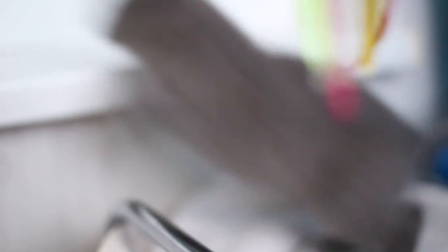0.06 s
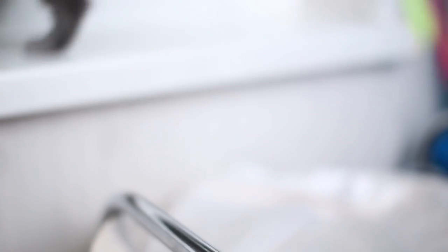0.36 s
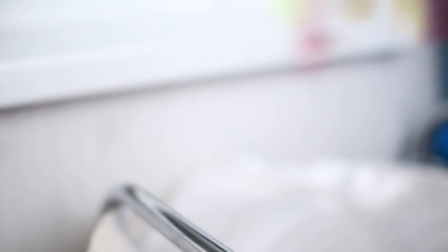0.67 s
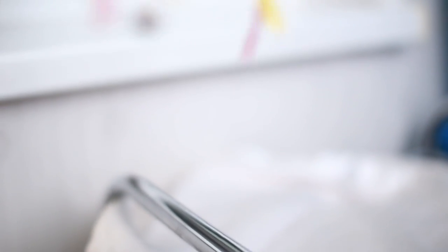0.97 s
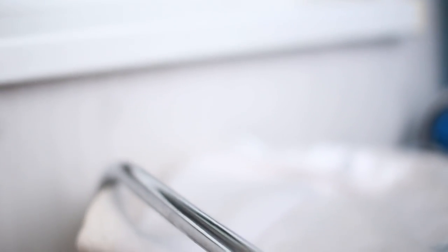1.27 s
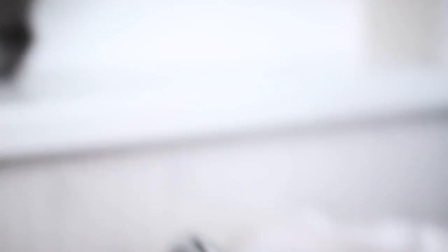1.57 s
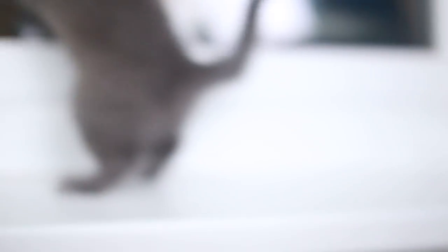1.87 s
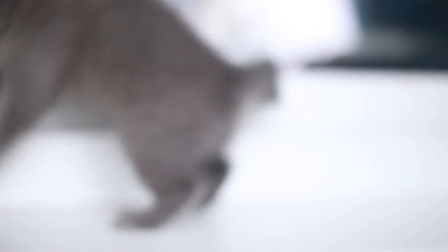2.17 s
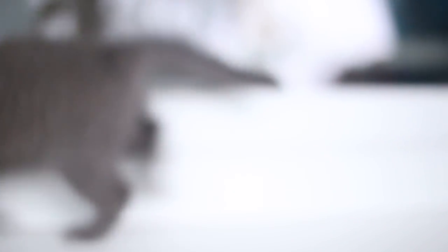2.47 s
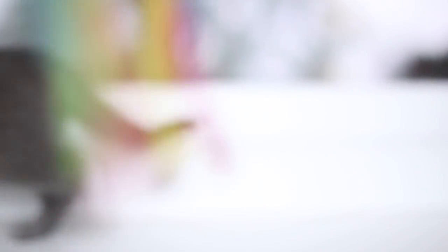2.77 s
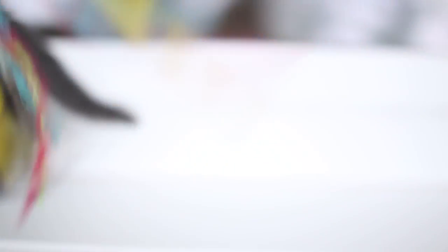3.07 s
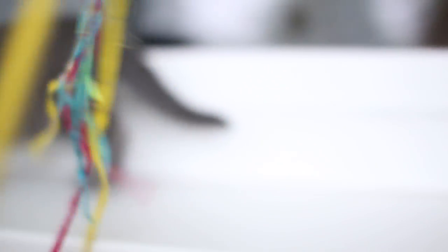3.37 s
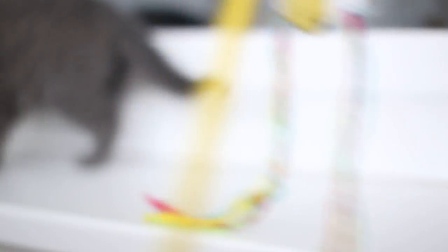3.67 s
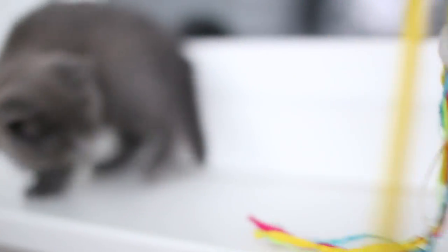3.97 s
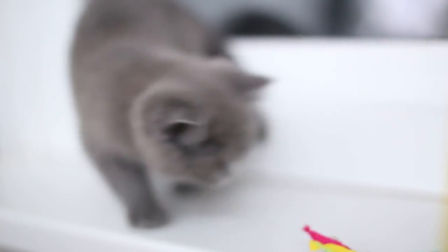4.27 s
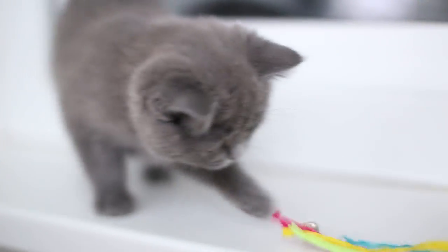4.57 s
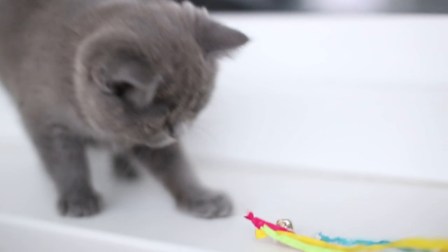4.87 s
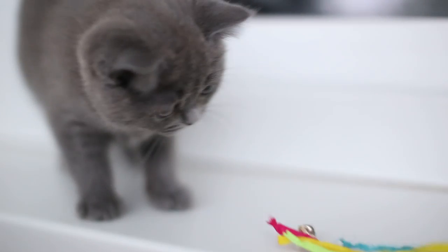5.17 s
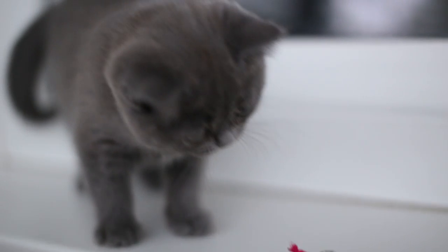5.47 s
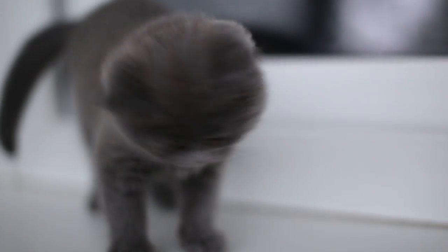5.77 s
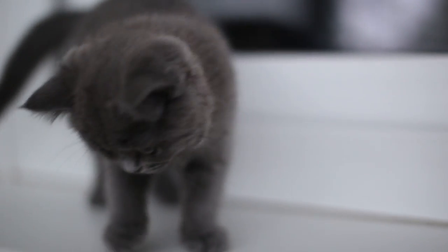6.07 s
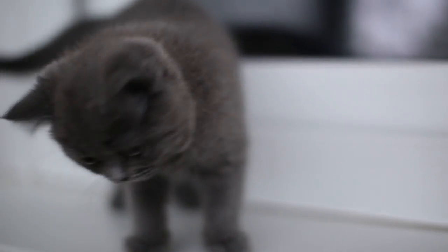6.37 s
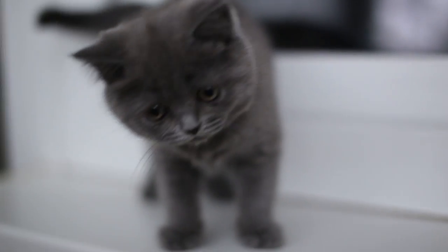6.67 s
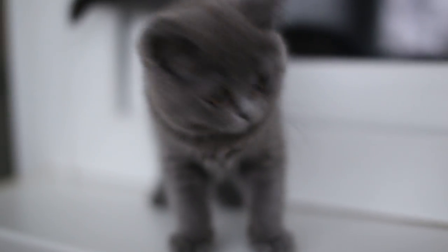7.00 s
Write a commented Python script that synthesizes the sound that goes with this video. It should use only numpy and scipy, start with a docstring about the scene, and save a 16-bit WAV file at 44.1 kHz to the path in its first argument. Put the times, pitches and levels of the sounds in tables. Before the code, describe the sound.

Soft kitten paws thud and scuff on a hollow wooden ledge while a wand toy clacks and its small bell jingles briefly.

```python
"""A small steel bell jingles on a ribboned wand toy as a kitten chases it along a hollow painted ledge.
A loose pellet strikes the bell's shell and excites its modes. The toy clacks down, ringing wand and
board; soft paws thud on the board and scuff over it by stick-slip friction. A small hard-walled room
reverberates after each contact, over a quiet hiss, a faint rustle and a low drone that comes and goes."""
import sys
import numpy as np
from scipy import signal
from scipy.fft import rfft, irfft, next_fast_len
from scipy.io import wavfile
from scipy.ndimage import uniform_filter1d

SR = 44100
rng = np.random.default_rng(int(sys.argv[2]) if len(sys.argv) > 2 else 0)


def transcribe(u):
    """Save the signal u as a 16-bit wav file named by the first command-line argument.

    u: samples, shape (n,) or (channels, n), limited to [-1, 1]; the rate is SR.
    q: integer samples, one column per channel.
    """
    v = np.clip(np.atleast_2d(u).T, -1, 1)
    q = np.round(v * 32767).astype(np.int16)
    wavfile.write(sys.argv[1], SR, q)


N = 314874
T = np.arange(int(.6 * SR)) / SR  # time axis of one event, in seconds

# Background spectra. Each row: frequency in Hz, relative level in dB.
AIR_SPECTRUM = [(15, -62), (25, -9), (59, 0.5), (80, -5), (141, -1), (161, -2), (261, -11), (352, -7),
                (527, -11), (572, -9.5), (1120, -13.5), (1980, -19), (2660, -37), (5370, -22),
                (15800, -31.5)]
DRONE_SPECTRUM = [(100, -18), (200, -5), (280, 1.5), (360, -9), (500, -16.5), (900, -20.5), (2000, -30),
                  (6000, -55)]
RUSTLE_SPECTRUM = [(200, -15), (800, 0.5), (3000, 1.5), (5500, -13), (9500, -12), (13000, -10),
                   (16000, -15)]
# The drone's swells. Each row: time in seconds, relative level in dB.
DRONE_CONTOUR = [(0.0, -57), (0.34, -58), (0.89, -70), (1.37, -61), (2.3, -71.5), (2.54, -58), (2.72, -53),
                 (3.14, -55), (3.32, -64), (7.14, -72)]
# Spectra of sliding fur and ribbon, a paw's thud, the knocked board, the wand and a hard contact point.
# Each row: frequency in Hz, relative level in dB.
HISS_SPECTRUM = [(1500, -30), (4000, 8), (5500, -0.5), (9500, 4.5), (12000, -5), (16000, -22)]
THUD_SPECTRUM = [(20, -29), (40, -12), (65, -12), (90, 3), (200, -1), (320, 0), (450, -12), (700, -18.5),
                 (1100, -31), (3000, -28.5), (9000, -57)]
BOARD_SPECTRUM = [(100, -32), (180, -22), (240, -10), (330, -2.5), (480, -2), (680, 3.5), (1000, 2.5),
                  (1500, 0.5), (2500, -9.5), (6000, -88)]
WAND_SPECTRUM = [(400, -11), (1000, -11), (1500, 2.5), (2300, -2), (3300, 4.5), (4500, 0), (5600, -12),
                 (7500, -10), (15000, -29)]
TICK_SPECTRUM = [(2000, -11), (4500, -3), (6000, 0.5), (8000, 7), (10000, 5.5), (12000, 0.5), (13500, -15),
                 (16000, -5)]
# Paws and ribbons slide. Each row: start in seconds, length in seconds, rub level in dB,
# centre in Hz, width in octaves, hiss relative to the rub in dB.
SLIDES = [(0.034, 0.055, -40.5, 1740, 0.55, -33), (.268, 0.03, -59, 2000, 1.7, -7),
          (0.376, 0.038, -44.5, 764, 0.79, -24), (0.462, 0.038, -46, 735, 0.93, -13),
          (0.503, 0.054, -47, 1310, 1.03, -7.5), (0.946, 0.035, -51.5, 3360, 0.23, -9),
          (0.991, .03, -49, 3950, 0.54, -15), (1.216, 0.034, -48.5, 3500, 0.49, -17),
          (1.503, 0.062, -37.5, 2350, 0.68, -9), (2.529, 0.06, -39.5, 1720, 0.89, -22),
          (2.723, 0.062, -40, 1870, 0.96, -25), (2.745, 0.048, -39, 2150, 0.59, -13),
          (3.28, 0.026, -32, 1590, 0.63, -28), (3.619, 0.12, -38, 2140, 1.45, -2.5),
          (4.194, 0.094, -56.5, 3360, 0.53, 2), (4.483, 0.11, -45, 2770, 1.04, -30),
          (4.56, 0.11, -47, 2360, 1.05, -29), (4.881, 0.027, -56.5, 3100, 0.74, -2.5),
          (4.947, 0.04, -54, 2500, 0.96, -2), (5.001, 0.097, -56, 587, 1.6, -2.5),
          (5.538, 0.088, -57, 1530, 1.4, -16), (5.719, 0.2, -59, 2800, 0.83, -4),
          (6.017, 0.51, -62, 3020, 0.84, 1), (6.439, 0.045, -54, 1820, 1.35, -0.5),
          (6.817, 0.058, -55.5, 3020, 0.85, -2.5)]
# Paws land. Each row: start in seconds, thud level in dB, flatness as a midrange boost in dB,
# boom frequency in Hz, boom t60 (time to fall 60 dB) in seconds.
LANDINGS = [(0.037, -52, 7, 281, 0.12), (.48, -48.5, -2, 293, 0.13), (.791, -48, 9, 192, 0.067),
            (0.813, -49.5, -11.5, 182.6, 0.19), (1.255, -42.5, 3.5, 213, .25),
            (1.266, -43, -2.5, 167.5, 0.52), (1.337, -53, -15, 184, .34), (1.514, -46.5, 2, 167, 0.19),
            (1.567, -47.5, 4, 106, 0.13), (2.039, -60.5, -2, 184, .07), (2.539, -40.5, 1.5, 130, 0.2),
            (2.617, -45, 2, 90, 0.17), (2.71, -49.5, -3, 266, 0.23), (2.745, -40.5, 0.5, 84, 0.22),
            (2.848, -54.5, -17, 94, 0.062), (3.566, -53, -1, 109.5, 0.35), (4.028, -47, 1, 185.6, .19),
            (4.565, -44, 6, 90.4, 0.21), (4.954, -54.5, 2, 149, .1), (5.011, -41.5, 5, 89.6, 0.29),
            (5.139, -56.5, 0, 77, 0.29), (5.602, -46, 11.5, 208, 0.22), (6.287, -42.5, -8.5, 206, .06),
            (6.291, -48, -10, 101.5, 0.21), (6.331, -51, -14, 199.5, 0.043),
            (6.447, -46.5, -8.5, 117, 0.18), (6.48, -53.5, -12, 167, 0.12), (6.955, -60, -11, 89, 0.11)]
# Toy and claws hit the ledge. Each row: start in seconds, base level in dB, wand's share from 0 to 1,
# relative tick level in dB, resonance of the struck spot in Hz.
BLOWS = [(.358, -55.5, .03, -27, 676), (0.46, -50.5, .05, -24, 714), (.511, -37.5, 0, -29, 668),
         (0.7864, -55, 0.05, -15, 690), (.881, -61.5, .5, -25, 3450), (.947, -53.5, 0.8, -12, 3240),
         (1.219, -50, 0, -16, 4170), (1.509, -44, 0.93, -8, 2740), (1.969, -45.5, 0, -22, 735),
         (1.97, -51, 0.35, -18, 3060), (3.2663, -31.5, 0.25, 1.5, 2130), (3.2673, -36, 0.4, 7, 316),
         (3.548, -32, 0.29, -2.5, 7540), (3.610, -28, 0.96, -5, 4370), (4.457, -41.5, 1, -36, 4310),
         (4.472, -49, .9, -28, 2470), (5.601, -47, 0.03, -32, 334), (6.507, -44, 0.85, -17, 3690),
         (6.597, -58.5, 1, 5, 8800)]
# Modes of the board and the stiff wand. Each row: frequency in Hz, relative level in dB, t60 in seconds.
BOARD_RESONANCES = [(354.6, 1.5, 0.41), (577, -16.5, 0.98), (698, 11.5, 0.12), (911, 10, 0.23),
                    (1264, -19, 0.27), (1500, -29, 0.58)]
WAND_RESONANCES = [(1367, -15, 0.34), (1715, -7, 0.13), (2088, -7, 0.1), (2500, -0.5, 0.042),
                   (3174, 3, 0.033), (3466, 6.5, 0.036), (3780, 0, 0.11), (4210, 4.5, 0.034),
                   (4660, 2, 0.04), (5950, -6.5, 0.071)]
# The bell's shell: three low and two high families of close modes. Each row is one family,
# and each of its modes: frequency in Hz, relative level in dB, t60 in seconds.
SHELL_FAMILIES = [
    [(2790, -13, 0.23), (4118, -1.5, 0.26)],
    [(4170, -17, 0.23), (4422, 10, 0.17), (4540, -6, .25), (4701, -6, .22), (4885, -3, 0.19)],
    [(4885, -14, 0.5), (4908, 1.5, 0.19)],
    [(9001, -12, 0.15), (9590, 1.5, 0.16), (10093, -2, 0.15)],
    [(11580, -8, 0.29), (11555, 0, 0.17), (15450, -21, .22)],
]
# Nominal pitch of each low family in Hz.
LOW_FAMILY_HZ = [4100, 4420, 4900]
# Level offset of each high family in dB.
HIGH_FAMILY_DB = [0.5, -4]
# The pellet hits the shell. Each row: start in seconds, base ring level in dB,
# pitch that the struck spot favours in Hz, hardness as a boost of the high families in dB.
PELLET_HITS = [(2.331, -49.5, 4900, -2.5), (2.348, -38, 4900, -2.5), (2.377, -44.5, 4900, -7),
               (2.410, -45.5, 4900, -5), (2.423, -52, 4900, 7.5), (2.445, -49.5, 4160, -4),
               (3.267, -37.5, 4900, 4.5), (3.278, -29.5, 4480, -5), (3.367, -44, 4900, 1),
               (3.548, -38, 4100, -4), (3.558, -45.5, 4100, 5), (3.578, -38.5, 4900, -2.5),
               (3.611, -35, 4100, 1), (3.633, -33, 4280, -14), (3.679, -42, 4200, -1.5),
               (4.506, -51, 4100, 3.5), (4.56, -47, 4300, -7), (4.645, -54.5, 4900, -22)]


def undb(db):
    """Amplitude ratio of a level in decibels."""
    return 10 ** (np.asarray(db) / 20)


def fade(t60):
    """Exponential decay: 60 dB are lost in t60 seconds."""
    return np.exp(-np.log(1000) * T / t60)


def noise(size):
    """Gaussian white noise: equal mean power at all frequencies."""
    return rng.standard_normal(size)


def colour(x, spectrum):
    """Minimum-phase filtering through (Hz, dB) points, by the folded cepstrum."""
    size = next_fast_len(len(x) + 2048, real=True)
    size += size % 2
    hz, db = np.transpose(spectrum)
    bin_hz = np.fft.rfftfreq(size, 1 / SR)
    log_gain = np.log(undb(np.interp(np.log(bin_hz + 1), np.log(hz), db)))
    cepstrum = irfft(log_gain)[:size // 2]
    cepstrum[1:] *= 2
    return irfft(rfft(x, size) * np.exp(rfft(cepstrum, size)))[:len(x)]


def level(x, db):
    """Short-time rms scaling: the loudest 30 ms are brought to the given level."""
    power = uniform_filter1d(x ** 2, int(.03 * SR), mode="constant").max()
    return x * undb(db) / np.sqrt(power)


def add(out, start_s, x):
    """Superposition: an event adds to the sound already there."""
    start = max(int(start_s * SR), 0)
    out[start:start + len(x)] += x[:N - start]


def room(x, wet_db):
    """Reverberation: dense early reflections and a tail, longest in the treble, follow the direct sound."""
    white = noise(len(T))
    bass, below_treble = (signal.sosfilt(signal.butter(1, hz, fs=SR, output="sos"), white)
                          for hz in (500, 5000))
    middle, treble = below_treble - bass, white - below_treble
    late = bass * fade(t60=0.21) + middle * fade(t60=0.36) + treble * fade(t60=0.42)
    early = noise(len(T)) * fade(t60=0.16)
    build_up = 1 - np.exp(-T / 0.0067)
    echo = signal.fftconvolve(x, (early + undb(-3) * late) * build_up)[:len(T)]
    return x + undb(wet_db) * echo * np.std(x) / np.std(echo)


def mode(hz, t60, drift_hz=0):
    """Free vibration of a damped oscillator struck at rest; its pitch may drift."""
    return np.sin(2 * np.pi * (hz * T + np.cumsum(drift_hz) / SR)) * fade(t60)


def ring(modes, sway_hz=0):
    """Modal superposition: the balance varies with each blow, and a tumbling body's pitches waver."""
    knots = np.linspace(0, T[-1], 40)
    out = np.zeros(len(T))
    for hz, db, t60 in modes:
        gain = undb(db + rng.normal())
        drift_hz = sway_hz * np.interp(T, knots, noise(len(knots)))
        out += gain * mode(hz, t60, drift_hz)
    return out


def crack(spectrum, t60):
    """Modal overlap: a brief contact excites so many damped modes that they merge into a noise burst."""
    return colour(noise(len(T)) * fade(t60), spectrum)


def wavering_noise(spectrum, waver_db, rate_hz):
    """Random amplitude modulation: coloured noise wanders in level about an rms of 1."""
    x = colour(noise(N), spectrum)
    wander = np.interp(np.arange(N) / SR * rate_hz, np.arange(512), noise(512))
    return x / np.std(x) * undb(waver_db * wander)


def background():
    """Incoherent sources add: room hiss, a swelling low drone and the rustle of fur and ribbons."""
    drone_db = 3 + np.interp(np.arange(N) / SR, *np.transpose(DRONE_CONTOUR))
    air = undb(-59) * wavering_noise(AIR_SPECTRUM, waver_db=-0.6, rate_hz=3.6)
    drone = undb(drone_db) * wavering_noise(DRONE_SPECTRUM, waver_db=2.5, rate_hz=7.9)
    rustle = undb(-60.5) * wavering_noise(RUSTLE_SPECTRUM, waver_db=.6, rate_hz=30)
    return air + drone + rustle


def scuffs(slips_per_s=2500, spread_db=2.0, skirt_db=9, rise_share=0.049):
    """Stick-slip friction: dense tiny slips drive a broad resonance and a hiss of fur and ribbon."""
    out = np.zeros(N)
    grid_hz = np.geomspace(60, 16000, 40)
    for start, length, rub_db, centre_hz, width, hiss_db in SLIDES:
        stroke = (1 - np.exp(-T / (rise_share * length))) * np.exp(-(T / length) ** 4)
        sizes = noise(len(T)) * undb(spread_db * np.minimum(rng.exponential(size=len(T)), 4))
        slips = sizes * (rng.random(len(T)) < slips_per_s / SR)
        friction = stroke * (slips + 0.25 * noise(len(T)))
        detuning = np.log2(grid_hz / centre_hz) / width
        steepness = np.where(grid_hz > centre_hz, 2, 1)
        resonance_db = -skirt_db * np.log1p(detuning ** 2 / 2) * steepness
        rub = colour(friction, np.c_[grid_hz, resonance_db])
        add(out, start, level(room(rub, wet_db=-1.5), rub_db))
        add(out, start, level(room(colour(friction, HISS_SPECTRUM), wet_db=0), rub_db + hiss_db))
    return out


def paws(contact_s=0.0027, boom_loss_per_flatness=0.46):
    """Soft impact: a slow push excites mainly low board modes; a flat pad slaps more and damps the boom."""
    out = np.zeros(N)
    push = 1 - np.exp(-T / contact_s)
    for start, db, flat_db, boom_hz, t60 in LANDINGS:
        spectrum = [(hz, band_db + flat_db * (400 < hz < 2000)) for hz, band_db in THUD_SPECTRUM]
        thud = colour(noise(len(T)) * push * fade(t60=0.093), spectrum)
        boom = push * mode(boom_hz, t60)
        add(out, start, level(room(thud, wet_db=-5.5), db))
        add(out, start, level(room(boom, wet_db=-7), db - boom_loss_per_flatness * flat_db))
    return out


def knocks(spot_cycles=14, bounce_above_share=.7, bounce_loss_db=9.5):
    """Hard impact: board and wand divide the energy, while the contact ticks and the struck spot rings."""
    out = np.zeros(N)
    for start, db, wand_share, tick_db, spot_hz in BLOWS:
        wand_share = np.clip(wand_share, .005, .995)
        board_db, wand_db = db + 10 * np.log10([1 - wand_share, wand_share])
        add(out, start, level(room(crack(BOARD_SPECTRUM, t60=0.042), wet_db=0), board_db))
        add(out, start, level(room(ring(BOARD_RESONANCES), wet_db=-8), board_db - 10))
        add(out, start, level(room(crack(TICK_SPECTRUM, t60=0.0038), wet_db=-1), db + tick_db))
        spot = mode(spot_hz, t60=0.017 + spot_cycles / spot_hz)  # low modes ring longer
        add(out, start, level(room(spot, wet_db=2.5), db - 2))
        # a wand that takes most of the blow strikes twice more, weaker each time
        for bounce, delay in enumerate([0, .012, 0.043]):
            clack = level(room(crack(WAND_SPECTRUM, t60=0.0077), wet_db=11), -4)
            wand_ring = level(room(ring(WAND_RESONANCES), wet_db=-4.5), -2)
            if bounce == 0 or wand_share > bounce_above_share:
                add(out, start + delay, (clack + wand_ring) * undb(wand_db - bounce * bounce_loss_db))
    # a high-pass at 190 Hz keeps low rumble out of the knocks
    return signal.sosfilt(signal.butter(4, 190, "high", fs=SR, output="sos"), out)


def bell(loss_db_per_octave=65, max_loss_db=12, tick_per_hardness=1.58, skitter_above_db=5):
    """Shell vibration: where the pellet hits selects the low modes; hardness adds high modes and tick."""
    out = np.zeros(N)
    for start, ring_db, spot_hz, hard_db in PELLET_HITS:
        octaves_off = np.abs(np.log2(np.array(LOW_FAMILY_HZ) / spot_hz))
        low_db = -np.minimum(loss_db_per_octave * octaves_off, max_loss_db)
        high_db = hard_db + np.array(HIGH_FAMILY_DB)
        for modes, family_db in zip(SHELL_FAMILIES, np.r_[low_db, high_db]):
            add(out, start, level(room(ring(modes, sway_hz=13.6), wet_db=-3.5), ring_db + family_db))
        tick_db = ring_db - 3 + tick_per_hardness * hard_db
        # after a very hard hit the pellet skitters round the shell, 1 dB weaker at each touch
        delays = [0, .005, .012, .02] if hard_db > skitter_above_db else [0]
        for touch, delay in enumerate(delays):
            tick = room(crack(TICK_SPECTRUM, t60=0.0052), wet_db=-3)
            add(out, start + delay, level(tick, tick_db - touch))
    return out


def scene():
    """Linear superposition: the pressures of all sources add at one point."""
    return (bell() + knocks() + paws() + scuffs() + background())[None]


def record(dry, ceiling=.45, top_hz=15850):
    """Soft saturation rounds the loudest peaks, and a steep low-pass filter limits the bandwidth."""
    rounded = ceiling * np.tanh(dry / ceiling)
    return signal.sosfilt(signal.ellip(10, .2, 80, top_hz, fs=SR, output="sos"), rounded)


dry = scene()
out = record(dry)
transcribe(out)
```